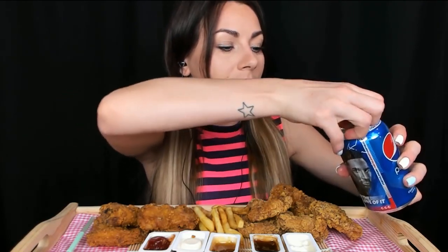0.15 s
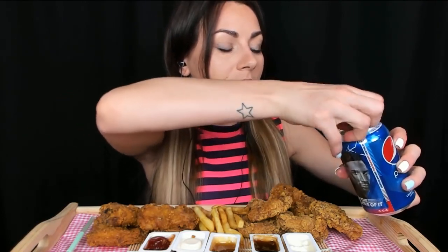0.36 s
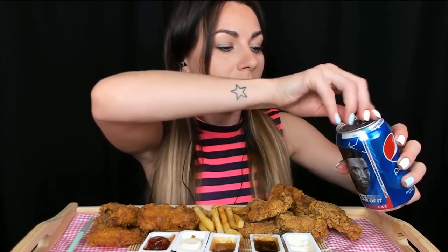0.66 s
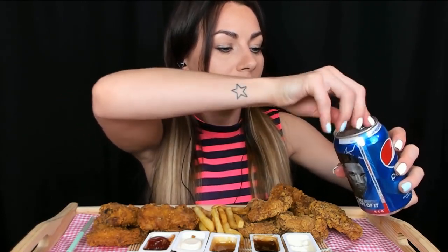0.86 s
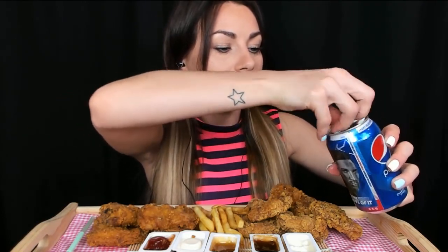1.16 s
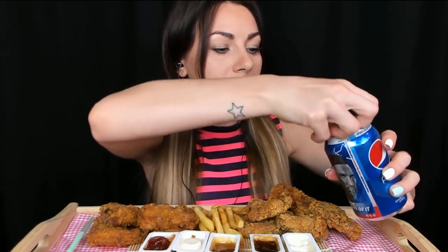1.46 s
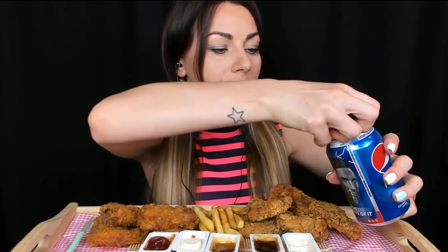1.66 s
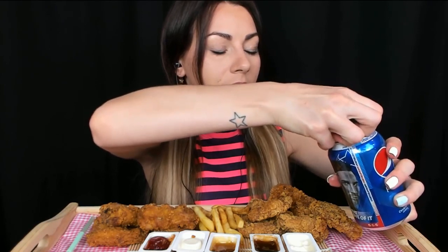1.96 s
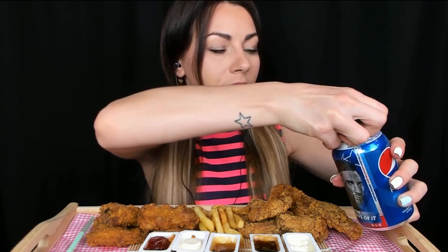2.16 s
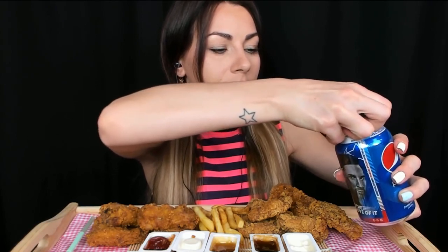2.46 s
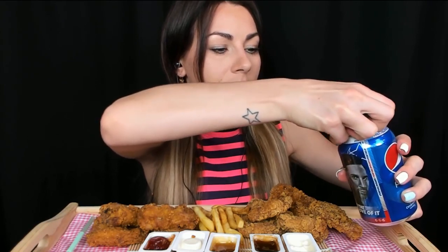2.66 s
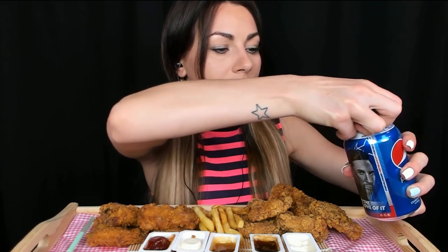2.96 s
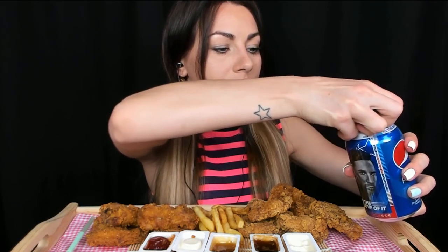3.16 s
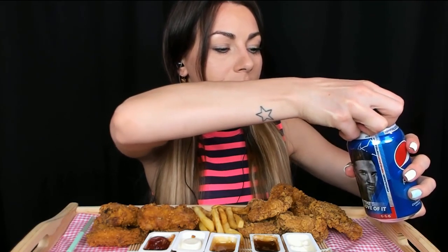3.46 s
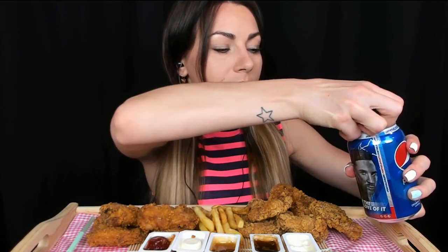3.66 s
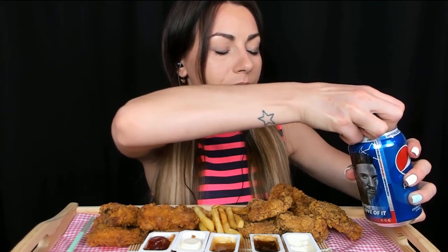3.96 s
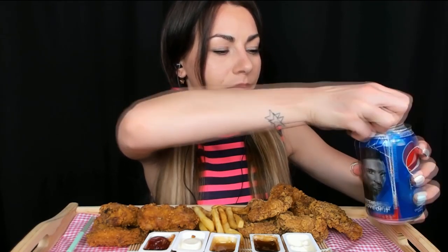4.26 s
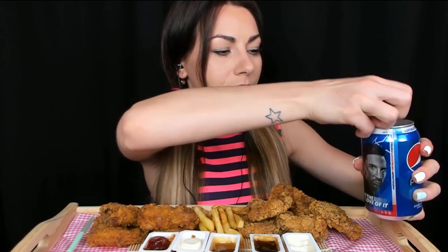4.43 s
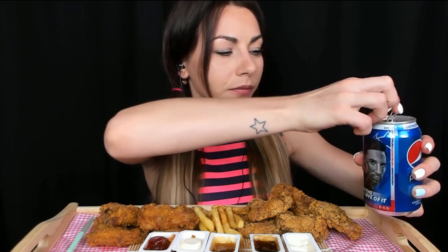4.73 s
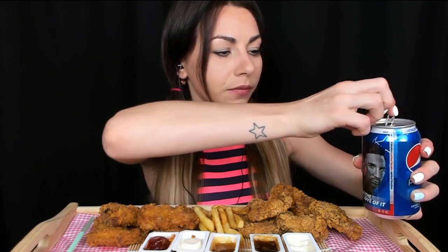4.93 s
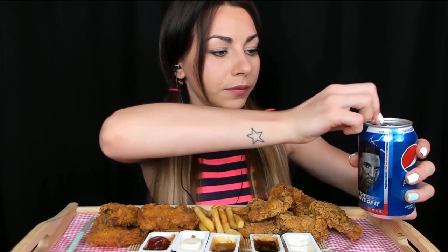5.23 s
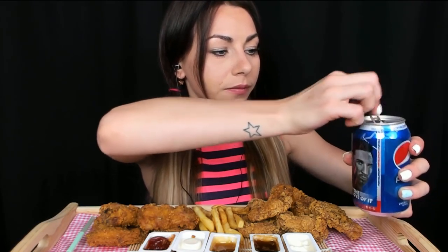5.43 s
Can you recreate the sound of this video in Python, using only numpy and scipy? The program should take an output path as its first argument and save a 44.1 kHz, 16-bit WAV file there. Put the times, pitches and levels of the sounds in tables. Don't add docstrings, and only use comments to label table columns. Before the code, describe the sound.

A full aluminium can is picked at and opened close up: nail clicks, creaking metal, a sharp hissing vent, lid snaps, fizz and tab knocks.

```python
import sys
import numpy as np
from scipy import signal
from scipy.fft import rfft, irfft, next_fast_len
from scipy.io import wavfile

SR = 44100
rng = np.random.default_rng(int(sys.argv[2]) if len(sys.argv) > 2 else 0)


def wav_out(sig):
    wavfile.write(sys.argv[1], SR, np.round(np.clip(np.atleast_2d(sig).T, -1, 1) * 32767).astype(np.int16))


def voltage_ratio(decibels):
    exponent = np.asarray(decibels, float) / 20
    return 10 ** exponent


N = 246519


def seconds():
    return np.arange(N) / SR


def in_time(rows, edge_s=.004):
    s, *columns = np.transpose(rows)
    s = np.r_[s[0] - edge_s, s, s[-1] + edge_s]
    return [np.interp(seconds(), s, np.r_[-140, c, -140]) for c in columns]


def rms_one(x):
    return x / np.sqrt(np.mean(x ** 2))


def pan(db):
    return voltage_ratio(np.array([db, -db]) / 2)


def laid(x, at):
    return np.pad(x, ((0, 0), (at, N - at - x.shape[1])))


def stereo_white(alike, size=N):
    mid, side = rng.standard_normal((2, size))
    alike = np.clip(alike, 0, 1)
    shared = np.sqrt(1 + alike) * mid
    apart = np.sqrt(1 - alike) * side * [[1], [-1]]
    return (shared + apart) / np.sqrt(2)


def coloured(x, spectrum):
    hz, db = np.transpose(spectrum)
    size = next_fast_len(x.shape[1], True)
    log_hz = np.log(np.arange(size // 2 + 1) * SR / size + 1)
    gains = voltage_ratio(np.interp(log_hz, np.log(hz), db, -90, -90))
    return rms_one(irfft(rfft(x, size) * gains, size)[:, :x.shape[1]])


def drift(rate_hz, size=N):
    r = np.exp(-16 * np.pi * rate_hz / SR)
    slow = signal.lfilter([1], [1, -2 * r, r * r], rng.standard_normal(size // 8 + 6002))
    slow = slow[6000:]
    return np.interp(np.arange(size) / 8, np.arange(len(slow)), rms_one(slow))


def band(x, low_hz, high_hz):
    return signal.sosfilt(signal.butter(2, [low_hz, high_hz], "band", fs=SR, output="sos"), x)


def patchy(x, edges_hz, patch_db, rate_hz):
    out = 0
    for k, (low_hz, high_hz) in enumerate(zip(edges_hz, edges_hz[1:])):
        swell = voltage_ratio(patch_db * drift(rate_hz, size=x.shape[1]))
        out = out + (-1) ** k * swell * band(x, low_hz, high_hz)
    return out


def ring(drive, hz, t60):
    r, w = voltage_ratio(-60 / (t60 * SR)), 2 * np.pi * hz / SR
    return signal.lfilter([0, np.sin(w)], [1, -2 * r * np.cos(w), r * r], drive + 1e-18)


def rings(drive, modes):
    return sum(voltage_ratio(db) * ring(drive, hz, t60) for hz, db, t60 in modes)


def add(out, s, gains, hz, t60):
    at = round(s * SR)
    click = np.arange(min(SR // 8, N - at)) == 0
    out[:, at:at + len(click)] += gains[:, None] * ring(click, hz, t60)


# from t/s, to t/s, level/dB
TURNED_DOWN = [
    (2.128, 2.462, -15),
    (3.999, 4.198, -14),
]


def fader_db(s):
    return sum(db * ((s > start) & (s < end)) for start, end, db in TURNED_DOWN)


def train(times, gains):
    at = np.round(np.asarray(times) * SR).astype(int)
    clicks = np.zeros((2, N))
    clicks[:, at] = gains * voltage_ratio(-fader_db(at / SR))
    return clicks


def cracks(clicks, low_hz, high_hz, t60, swell_s, alike):
    r = np.exp(-1 / (swell_s * SR))
    envelope = signal.lfilter([1], [1, -voltage_ratio(-60 / (t60 * SR))], clicks + 1e-18)
    envelope = signal.lfilter([1 - r], [1, -r], envelope)
    return envelope * rms_one(band(stereo_white(alike, size=clicks.shape[1]), low_hz, high_hz))


def hits(rows, side_db, modes, ring_db, crack_db, crack_t60, scatter_db,
         low_hz=1300, split_hz=6500, swell_s=0.00033):
    s, db, bright_db = np.transpose(rows)[:3]
    sizes = voltage_ratio(db) * pan(side_db)
    part = slice(round((s.min() - .01) * SR), round((s.max() + .3) * SR))
    dull = train(s, sizes * voltage_ratio(crack_db))[:, part]
    bright = train(s, sizes * voltage_ratio(bright_db + crack_db + 7.5))[:, part]
    out = cracks(dull, low_hz, split_hz, crack_t60, swell_s, 0.21)
    out += cracks(bright, split_hz, 16000, 0.66 * crack_t60, swell_s, 0.62)
    chance = rng.standard_normal((len(s), len(modes), 4))
    for k, (hz, mode_db, t60) in enumerate(modes):
        both, left, right, late = chance[:, k].T
        lift_db = (bright_db + 10.5) * (hz > 6500)
        uneven_db = scatter_db * (both + np.array([left, right]) / 2)
        strength = voltage_ratio(ring_db + mode_db + lift_db + uneven_db)
        struck_s = s + 1.6 * swell_s * abs(late)
        out += ring(train(struck_s, sizes * strength)[:, part], hz, t60)
    return laid(band(out, 0.91 * modes[0][0], 18000), part.start)


# f/Hz, level/dB per Hz
RUMBLE = [(12, -27), (20, -2), (70, -16), (101, -13.5), (118, -19), (215, -10), (252, -16.5), (316, -16),
          (370, -22), (414, -17.5), (600, -24.5), (780, -59), (1320, -120)]
# f/Hz, level/dB per Hz
AIR = [(350, -31), (600, -4.5), (737, -3.5), (1260, -3.5), (1480, -6.5), (1770, -4), (2150, -7.5),
       (2830, -6.5), (3070, -9.5), (4320, -15.5), (6520, -18), (14200, -18), (15900, -18.5)]


def air():
    rumble = voltage_ratio(-61 + 1.0 * drift(8)) * coloured(stereo_white(.33), RUMBLE)
    hiss = voltage_ratio(-65.5) * coloured(stereo_white(0.39), AIR)
    return (rumble + hiss) * pan(0.31)[:, None]


# first t/s, until t/s
BLINKS = [
    (0.269, 4.19),
    (4.193, 5.59),
]


def blinks():
    period_s, level_db = .4265, -44.5
    s = np.concatenate([np.arange(start, end, period_s) for start, end in BLINKS])
    steps = np.zeros(N)
    steps[(s * SR).astype(int)] = voltage_ratio(level_db) * (-1) ** np.arange(1, len(s) + 1)
    t = seconds()[:SR // 2]
    onset = 1 - np.exp(-(t / 0.0057) ** 2)
    pulse = onset * (0.63 * np.exp(-t / 0.025) + 0.13 * np.exp(-t / .12))
    return signal.fftconvolve(steps, pulse)[:N] * pan(2.5)[:, None]


# t/s, peak level/dB, brightness level/dB, lid f/Hz, tab f/Hz
NAILS = [(0.3427, -55, -11, 1810, 6000), (0.389, -43, -3, 2440, 6100), (0.3974, -43, -10, 1820, 5400),
         (0.405, -36, -22, 2640, 5880), (0.4634, -54, -2, 2670, 6110), (0.4913, -44, -14, 2130, 3980),
         (0.5267, -50, -13, 2030, 4700), (0.5404, -45, -14, 2000, 6140), (0.6779, -26, -4, 2070, 5080),
         (0.6834, -33, -12, 2130, 5800), (0.7035, -46, -12, 2600, 5600), (0.7058, -43, -10, 2600, 5300),
         (0.7083, -34, -10, 1990, 5450), (0.7806, -45, -15, 1820, 5700), (0.8021, -35, -4, 2580, 5800),
         (0.8209, -42, -21, 1820, 4700), (0.862, -30, -16, 2000, 5450), (0.865, -37, -14, 2020, 5200),
         (0.9926, -51, -11, 1980, 5500), (1.04, -43, -13, 1906, 4870), (1.1837, -46, -12, 1860, 5000),
         (3.9883, -52.5, -17, 1750, 4870)]
# f/Hz, level/dB, t60 t/s
CLOSED = [(1442, -14.5, 0.14), (2032, -1.5, 0.053), (2130, -31, .03), (2640, -3, .035), (2930, -13, 0.051),
          (3500, -22.5, .02), (4260, -11, 0.036), (5080, -15, 0.018), (5750, -10, 0.047), (5850, -4, 0.018),
          (8000, -9, 0.012), (9700, -18, 0.0088)]


def nails():
    left_db, lid_t60_s, tab_t60_s = 3, .032, .014
    out = hits(NAILS, np.full(len(NAILS), left_db), CLOSED, -15.5, -8.0, 0.018, 2.5)
    for s, db, bright_db, lid_hz, tab_hz in NAILS:
        add(out, s, voltage_ratio(db - 11.5) * pan(left_db), lid_hz, lid_t60_s)
        add(out, s, voltage_ratio(db - 7.5) * pan(left_db), tab_hz, tab_t60_s)
    return out


def room(x):
    t60_s, level_db, cut_hz = 0.28, -13.5, 7000
    t = seconds()[:SR]
    tail = band(rng.standard_normal((2, SR)), 200, cut_hz) * voltage_ratio(-60 * t / t60_s) * (t > .006)
    tail = tail / np.sqrt(np.sum(tail ** 2, axis=1, keepdims=True))
    return voltage_ratio(level_db) * signal.fftconvolve(x, tail, axes=1)[:, :N]


# from t/s, to t/s, first load level/dB, last load level/dB
PULLS = [
    (1.4914, 1.542, -52.5, -44.5),
    (1.5492, 1.58, -40.5, -47.5),
    (1.654, 1.811, -44, -51.5),
    (1.8563, 1.885, -49.5, -53),
    (1.936, 1.991, -54, -51.5),
    (2.0333, 2.076, -58.5, -56),
]


def pull_db():
    loads = []
    for start, end, first_db, last_db in PULLS:
        loads.append(in_time([(start, first_db), (end, last_db)], .05)[0])
    return np.max(loads, axis=0)


# peak t/s, can ring level/dB, rise t/s per 20 dB, fall t/s per 20 dB,
# dry scratch above the ring level/dB
RUB = [
    (0.405, -60, 0.05, 0.05, 10.5),
    (0.538, -52, .035, 0.08, -7.5),
    (0.68, -63, 0.04, .1, 5),
    (0.809, -50.5, 0.1, .045, -1),
    (0.864, -59, .006, 0, 12),
    (1.005, -59, 0.07, 0.08, 4),
    (1.042, -47, .003, 0.01, -18),
    (1.188, -64, -0.38, -2, -8),
    (1.27, -76, 0.2, 0.1, 11),
]
# f/Hz, level/dB per Hz
SCRATCH = [(1760, -31), (3000, -41), (3190, -8), (3620, 4.5), (3930, -10), (5910, 2), (6520, -11),
           (8250, 0), (10800, -6.5), (12600, -5.5), (15700, -23)]
# f/Hz, level/dB, t60 t/s
LOADED = [(1478, -5.5, 0.038), (1773, -7, 0.028), (2040, -8, 0.057), (2450, -9, .03), (2910, -3, 0.03),
          (4600, -10, .012), (8200, -9.5, 0.011), (11500, -7, 0.00599)]


def rubbing():
    t, load_db = seconds(), pull_db()
    ring_db = load_db - 7.5
    dry_db = -60 + 1.5 * (load_db + 47.5)
    for s, db, rise_s, fall_s, scratch_db in RUB:
        stroke_db = db - 20 * np.maximum((s - t) / rise_s, (t - s) / fall_s)
        ring_db = np.maximum(ring_db, stroke_db)
        dry_db = np.maximum(dry_db, stroke_db + scratch_db)
    grains = stereo_white(0.71) * voltage_ratio(1.0 * drift(270))
    body = voltage_ratio(ring_db - 13.5) * rms_one(rings(grains, LOADED[:6]))
    scratch = voltage_ratio(dry_db - 5.5) * coloured(grains, SCRATCH)
    return (body + scratch) * pan(3.8)[:, None]


# t/s, pitch f/Hz, level/dB
SQUEAK = [
    (0.772, 1825, -73),
    (0.78, 1820, -67),
    (0.834, 1885, -53.5),
    (0.854, 1970, -66),
    (0.858, 1937, -72),
]


def squeak():
    s, hz, db = np.transpose(SQUEAK)
    pitch_hz = np.interp(seconds(), s, hz) * (1 + 0.0054 * drift(80))
    phase = 2 * np.pi * np.cumsum(pitch_hz) / SR
    level_db = in_time(SQUEAK, .01)[1] + 2.0 * drift(60)
    stirred = voltage_ratio(-17.0) * rms_one(ring(rng.standard_normal(N), 2754, 0.044))
    return voltage_ratio(level_db) * (np.sqrt(2) * np.sin(phase) + stirred) * pan(2.9)[:, None]


# t/s, peak level/dB, brightness level/dB
SLIPS = [(1.4904, -50, -5.5), (1.499, -46, -5.5), (1.507, -44, -5.5), (1.516, -44, -5.5),
         (1.5249, -42, -5.5), (1.5364, -41, -5.5), (1.5494, -36, -5.5), (1.5574, -38, -5.5),
         (1.5684, -38, -5.5), (1.5774, -44, -5.5), (1.6097, -42, -5.5), (1.6352, -42, -5.5),
         (1.6546, -39, -5.5), (1.6654, -40, -5.5), (1.6754, -39, -5.5), (1.6844, -43, -5.5),
         (1.6924, -44, -5.5), (1.7014, -44, -5.5), (1.713, -43, -5.5), (1.726, -42, -5.5),
         (1.7364, -43, -5.5), (1.7494, -47, -5.5), (1.7624, -44, -5.5), (1.7754, -46, -5.5),
         (1.7874, -46, -5.5), (1.7994, -48, -5.5), (1.8104, -42, -5.5)]
# t/s, peak level/dB, brightness level/dB
LATE_SLIPS = [(1.8302, -42, -2.5), (1.8552, -50, -2.5), (1.8684, -48, -2.5), (1.8834, -48, -2.5),
              (1.92, -50, -2.5), (1.9355, -49, -2.5), (1.9445, -49, -2.5), (1.9525, -45, -2.5),
              (1.9679, -43, -2.5), (1.9784, -45, -2.5), (1.9914, -54, -2.5), (2.0328, -53, -2.5),
              (2.0454, -52, -2.5), (2.0574, -56, -2.5), (2.0654, -52, -2.5), (2.0744, -52, -2.5),
              (2.1051, -52, -2.5), (2.1174, -57, -2.5)]


def slips():
    rows = np.r_[SLIPS, np.array(LATE_SLIPS) - [0, 2.5, 0]]
    return voltage_ratio(-4.5) * hits(rows, np.full(len(rows), 3.), LOADED, -6.5, -3.5, 0.013, 1.8)


# t/s, peak level/dB, brightness level/dB, left-right level/dB
SNAPS = [
    (2.1554, -34, -11, 2.5),
    (2.16, -12.5, -9, 1),
    (4.0309, -31.5, -6.5, 11),
    (4.0352, -24, -10, 0.5),
    (4.0672, -35.5, -10, 17),
    (4.0746, -30.5, -11, -5),
    (4.1106, -33, -7.5, 5.5),
    (4.1925, -43, -10, 2),
]
# f/Hz, level/dB, t60 t/s
TORN = [(647.5, -14.5, 0.0074), (1012, -12, .008), (2580, -3.5, 0.016), (3170, -1.5, 0.012),
        (3700, -0.5, 0.017), (4950, -4.5, 0.017), (5410, -7, 0.024), (7100, -10, 0.0054),
        (9180, -0.5, 0.008)]


def snaps():
    return hits(SNAPS, np.array(SNAPS)[:, 3], TORN, -11, -6, 0.0072, 1, low_hz=2210, swell_s=0.00063)


# t/s, level/dB before the fader
JET = [
    (2.16, -10),
    (2.192, -7),
    (2.225, -11.5),
    (2.275, -15.5),
    (2.302, -12.5),
    (2.36, -27),
    (2.41, -45),
    (2.6, -76),
    (2.72, -84),
]
# f/Hz, level/dB per Hz
HISS = [(4060, -52), (6900, -25), (7890, -2.5), (8290, 1.5), (8700, -1.5), (9760, -5), (10200, -7.5),
        (13300, -35.5), (22000, -120)]
# f/Hz, level/dB per Hz
TOP_HISS = [(5760, -33), (9800, -11), (11500, 1), (13700, -7), (15000, -7), (15900, -12)]
# f/Hz, level/dB per Hz
ROAR = [(290, -36.5), (500, -14.5), (864, -8), (1060, -7), (1310, -5.5), (1760, -7), (1950, -4), (2360, -1),
        (3450, -0.5), (4510, 2), (5820, 1.5), (6890, -1.5), (7200, 3), (9360, -33.5), (15800, -120)]
# t/s, level/dB
SEEP = [
    (4.04, -62),
    (4.122, -57),
    (4.19, -69.5),
]
# f/Hz, level/dB per Hz
SEEP_COLOUR = [(350, -65), (600, -35), (2000, -34), (2520, -11), (3050, -18.5), (3790, -6), (4230, -7.5),
               (5050, 7.5), (6030, -11), (7210, -3), (8970, -23), (11300, -13.5), (15700, -47)]


def jet():
    t = seconds()
    flow_db, = in_time(JET, .002)
    since = np.maximum(t - JET[0][0], 0)
    shut_db = 2 * np.minimum(flow_db + 90.5, 0)
    hiss_db = flow_db - 10 * np.maximum(1 - since / .018, 0)
    top_db = -6.8 + 1.08 * (flow_db + 8.5)
    roar_db = shut_db - 16.5 - 70 * since + 5.5 * np.exp(-since / .012) + .3 * (flow_db + 7)
    puff_db = shut_db - 30.5 - 80 * since - 14.5 * (t > 2.268)

    blowing = np.interp(t, [2.32, 2.37], [1, 0])
    flutter = voltage_ratio(.6 * blowing * drift(150))
    at, end = round(2.1 * SR), round(2.8 * SR)
    gusts, size = blowing[at:end], end - at
    hiss = patchy(stereo_white(0.4, size=size), np.geomspace(6000, 11000, num=9), 1.8 * gusts, 25)
    top = patchy(stereo_white(0.35, size=size), np.geomspace(9000, 16500, num=12), 1.8 * gusts, 25)
    roar = patchy(stereo_white(0.29, size=size), np.geomspace(400, 8000, num=26), 2.6 * gusts, 20.5)
    roar = coloured(roar, ROAR)
    shell = voltage_ratio(-11.5) * rms_one(rings(roar, CLOSED))
    out = voltage_ratio(hiss_db) * laid(coloured(hiss, HISS), at) * pan(4.7)[:, None]
    out += voltage_ratio(top_db) * laid(coloured(top, TOP_HISS), at) * pan(2.8)[:, None]
    out += voltage_ratio(roar_db) * laid(roar + shell, at) * pan(2.5)[:, None]

    puff = voltage_ratio(puff_db) * rms_one(band(stereo_white(0.2036), 18, 600)) * pan(2.1)[:, None]
    seep_db = in_time(SEEP, .006)[0] - fader_db(t) + 1.5 * drift(100)
    seep = voltage_ratio(seep_db) * coloured(stereo_white(.4), SEEP_COLOUR)
    late = t - 2.4
    echo_db = -40.5 - 60 * np.where(late > 0, late / .45, -late / .05)
    echo = voltage_ratio(echo_db) * rms_one(band(stereo_white(.2), 2500, 12000))
    return flutter * out + puff + seep + echo


# t/s, froth level/dB, opening level/dB
FIZZ = [
    (4.2, -71.5, -7),
    (4.3, -65.5, -2.5),
    (4.45, -64, -1),
    (4.58, -65.5, -4),
    (4.8, -67.5, 2.5),
    (5.04, -69.5, 0),
    (5.27, -69.5, 2),
    (5.59, -70.5, 3.5),
]
# f/Hz, level/dB per Hz
FIZZ_BODY = [(410, -20), (700, -6.5), (909, -1), (1210, -8.5), (1590, -10), (1710, -6), (2010, -8),
             (2200, -9), (2460, 0.5), (3230, 0.5), (3580, -1), (3930, -0.5), (4780, -2), (5150, -3.5),
             (6500, -7), (8450, -19), (14300, -120)]
# f/Hz, level/dB per Hz
FIZZ_TOP = [(4500, -28.5), (5800, -6), (7500, -8), (10000, -6.5), (13000, -7), (15000, -6.5), (15900, -11)]
# t/s, level/dB, t60 t/s
ECHO = (4.198, -48.5, 0.47)
# f/Hz, level/dB per Hz
ECHO_COLOUR = [(120, -47), (200, -20), (515, -14), (742, -20), (940, -11), (1010, -24), (1110, -11),
               (1710, -9.5), (2900, -1), (5010, -13), (15500, -33)]
# f/Hz, level/dB, t60 t/s
OPENED = [(837, -18, 0.167), (970, -15, 0.055), (1080, -21, 0.085), (2377, -7, 0.016), (2963, -13.5, 0.035),
          (4900, -37, .02)]


def fizz():
    at = round(4.1 * SR)
    size = N - at
    froth_db, open_db = in_time(FIZZ, 0.002)
    shut_db = np.minimum(froth_db + 79.5, 0)
    lagging_db = np.interp(seconds() - 0.14, *np.transpose(FIZZ)[:2])
    hole_db = (shut_db - 66.5 + 0.82 * (lagging_db + 67))[at:]
    top_db, body_db = froth_db[at:], open_db[at:] - 60.5
    after = (seconds() - ECHO[0])[at:]
    bursts = voltage_ratio(1.6 * drift(470, size=size) + 0.9 * drift(12.0, size=size))

    body = patchy(bursts * stereo_white(0.65, size=size), np.geomspace(500, 8000, num=17), 1.3, 5.0)
    body = voltage_ratio(body_db) * coloured(body, FIZZ_BODY)
    body = signal.lfilter(*signal.iirnotch(3600, 14, SR), body)
    walls = rings(bursts * stereo_white(1.0, size=size), OPENED)
    body += voltage_ratio(body_db - 12) * rms_one(walls)
    hole = voltage_ratio(hole_db + 2.5) * rms_one(band(bursts * stereo_white(0.61, size=size), 7830, 9400))
    top = patchy(bursts * stereo_white(0.44, size=size), np.geomspace(4500, 17000, num=12), 1.2, 5.0)
    top = voltage_ratio(top_db + 5.5) * coloured(top, FIZZ_TOP)

    echo_db = ECHO[1] + 6.0 - 60 * abs(after) / ECHO[2] + 0.53 * drift(67, size=size)
    echo = (after > 0) * voltage_ratio(echo_db) * coloured(stereo_white(0.36, size=size), ECHO_COLOUR)
    return laid((body + hole + top) * pan(3.5)[:, None] + echo * pan(-0.9)[:, None], at)


# t/s, peak level/dB, cavity f/Hz, brightness level/dB, t60 t/s
KNOCKS = [(4.3605, -28, 670, -14, 0.011), (4.385, -58, 886, 16, 0.015), (4.438, -44.5, 670, -23, 0.02),
          (4.451, -52, 750, -14, 0.023), (4.566, -49.5, 775, -15, 0.023), (4.991, -30, 946.6, -3, 0.018),
          (5.004, -46, 900, -9, 0.04), (5.036, -48, 960, -12, 0.02), (5.021, -44, 1030, -8, 0.017),
          (5.3935, -30, 930, -9, 0.016), (5.396, -45, 520, -20, 0.04), (5.397, -44, 2377, -20, 0.03),
          (5.403, -41, 1150, -12, 0.07)]


def knocks():
    rows = np.array(KNOCKS)
    s, db, bright_db = rows[:, 0], rows[:, 1], rows[:, 3]
    ticks = np.c_[s, db + bright_db, -10 + 1.2 * np.minimum(bright_db + 3.0, 0)]
    out = hits(ticks, np.full(len(rows), 4.), OPENED, -2.4, -1.2, .012, 3.2, low_hz=990, split_hz=3950)
    thumps = np.zeros((2, N))
    for s, db, hz, bright_db, t60 in KNOCKS:
        at = round(s * SR)
        thump = band(ring(np.arange(SR // 8) == 0, hz, t60), .7 * hz, 2.4 * hz)
        thumps[:, at:at + len(thump)] += voltage_ratio(db - 1.5) * pan(6.2)[:, None] * thump
    return out + thumps


def scene():
    struck = nails() + slips() + snaps() + knocks()
    return struck + room(struck) + rubbing() + squeak() + jet() + fizz() + air() + blinks()


# from t/s, to t/s, centre f/Hz, width f/Hz
DROPPED = [(2.18, 2.23, 12500, 250), (2.24, 2.29, 14000, 250), (2.22, 2.31, 6800, 160),
           (2.243, 2.272, 7100, 520), (2.21, 2.25, 5000, 130), (2.235, 2.275, 6350, 130),
           (2.285, 2.325, 6100, 400), (2.27, 2.33, 13300, 200), (2.28, 2.32, 4500, 120),
           (2.215, 2.245, 4150, 160), (2.24, 2.33, 3500, 150), (2.3, 2.36, 2800, 90),
           (4.215, 4.245, 12300, 300), (4.7, 4.81, 3600, 150)]


def drop_bands(x):
    out = x.copy()
    for start, end, hz, width_hz in DROPPED:
        part = slice(round((start - .006) * SR), round((end + .006) * SR))
        edges_hz = [hz - .7 * width_hz, hz + .7 * width_hz]
        lost = signal.sosfiltfilt(signal.butter(4, edges_hz, "band", fs=SR, output="sos"), out[:, part])
        out[:, part] -= signal.windows.tukey(lost.shape[1], .3) * lost
    return out


def top_cut(x):
    return signal.sosfilt(signal.butter(12, 16640, fs=SR, output="sos"), x)


def record(dry):
    overload = 1.4
    dry = overload * np.tanh(dry / overload)
    steep = signal.ellip(10, .3, 42, 15750, fs=SR, output="sos")
    cut = signal.sosfilt(steep, dry * voltage_ratio(fader_db(seconds())))
    cut[1, 1:] = cut[1, :-1].copy()
    return top_cut(drop_bands(cut))


dry = scene()
out = record(dry)
wav_out(out)
```